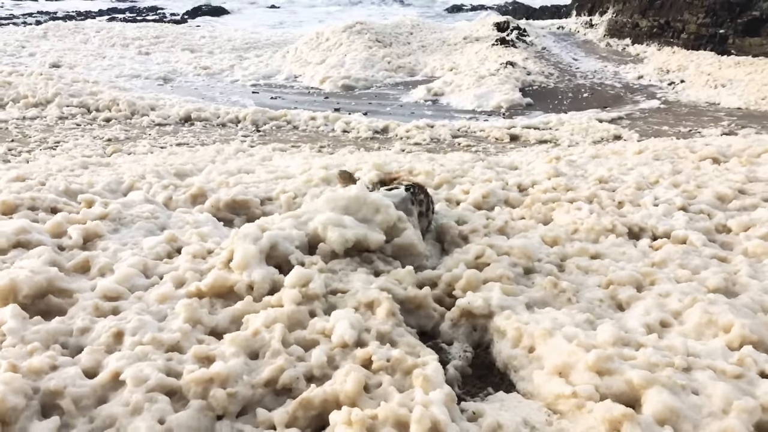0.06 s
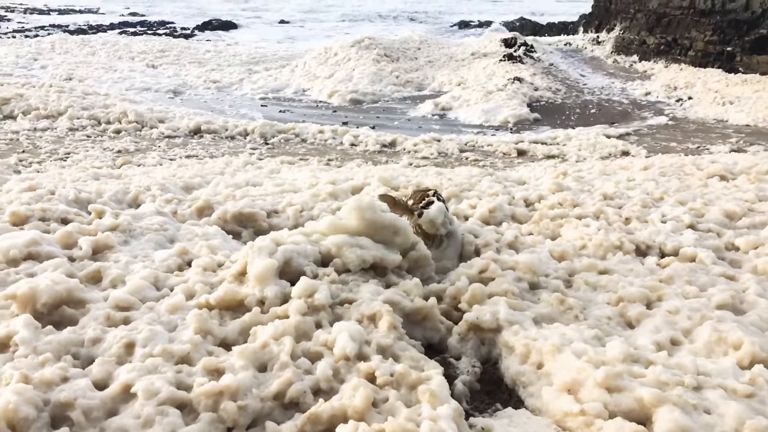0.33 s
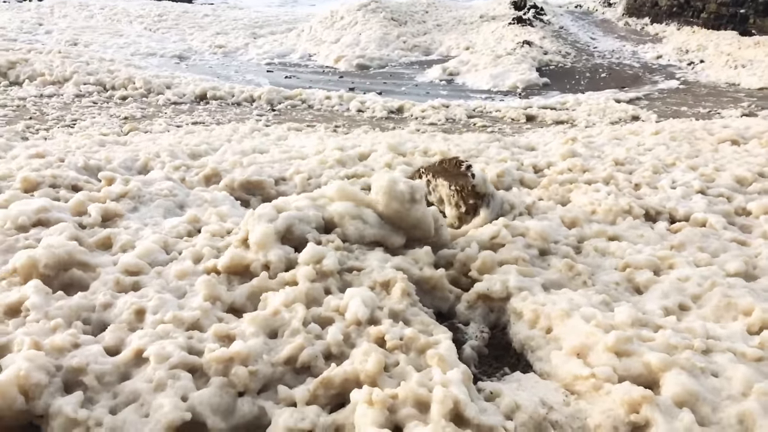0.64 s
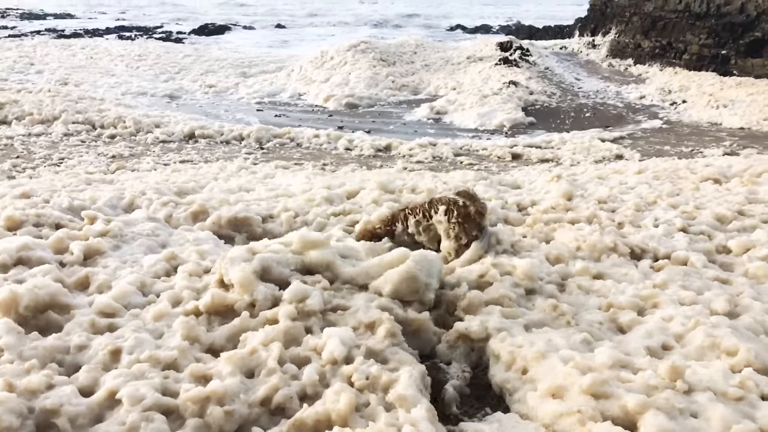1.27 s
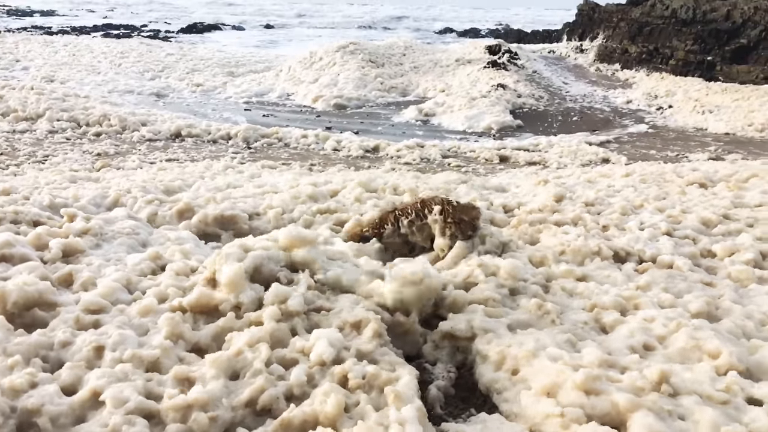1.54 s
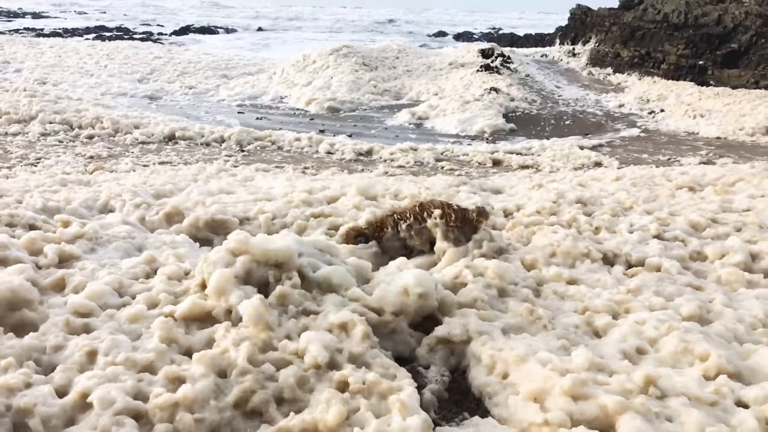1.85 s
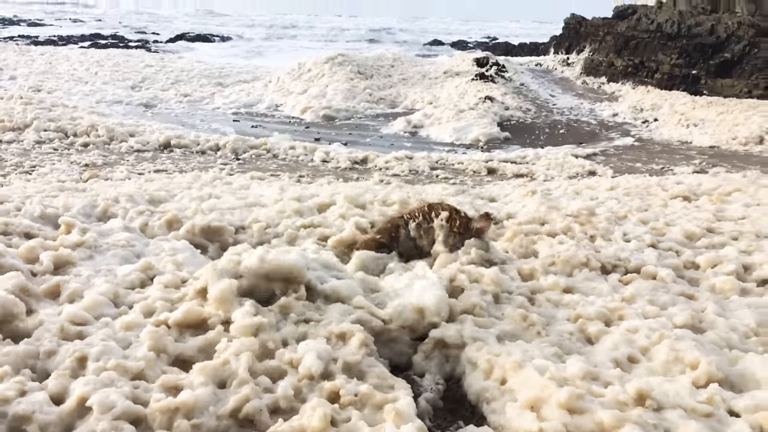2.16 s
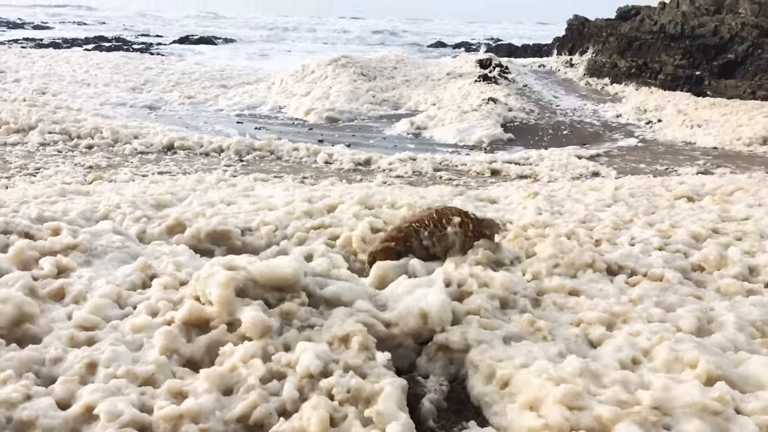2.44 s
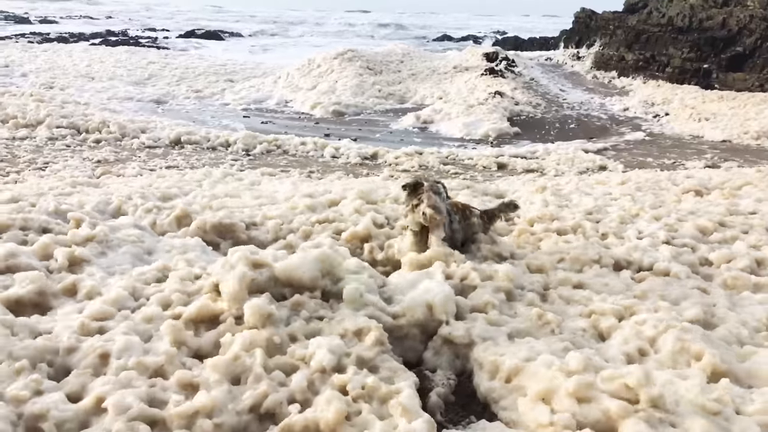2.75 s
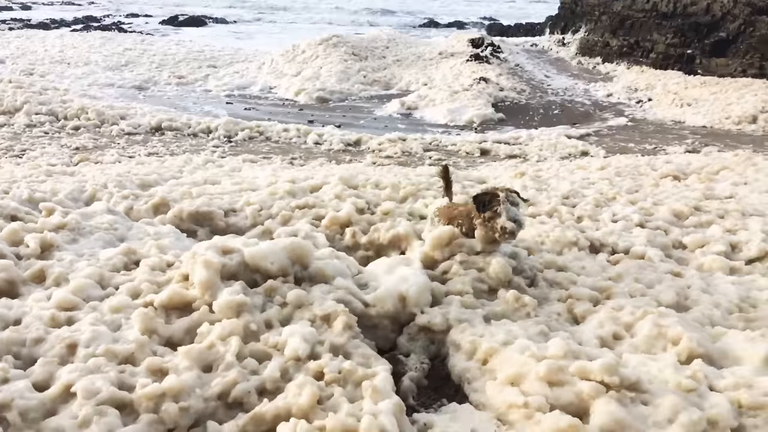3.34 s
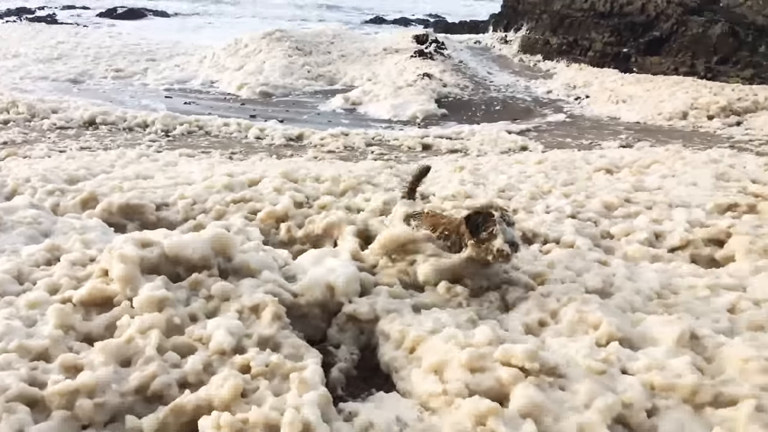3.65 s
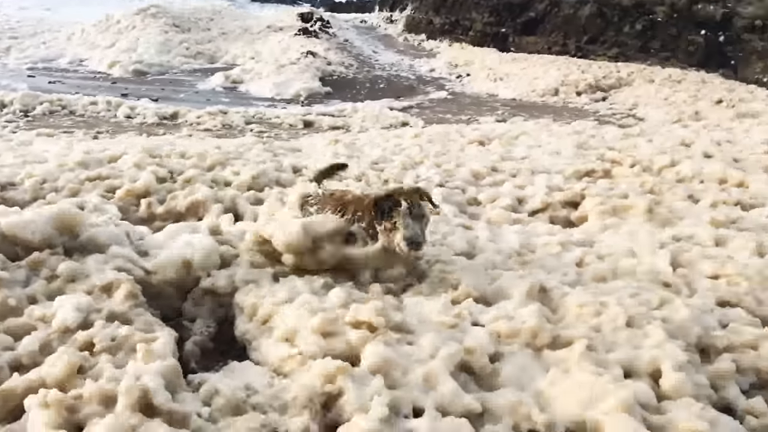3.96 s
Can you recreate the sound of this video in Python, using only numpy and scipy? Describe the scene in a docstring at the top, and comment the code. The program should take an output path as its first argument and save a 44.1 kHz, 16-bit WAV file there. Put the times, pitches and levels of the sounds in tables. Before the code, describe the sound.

Strong wind buffets the microphone on a beach, a low, fluttering rumble broken by irregular thumps and sharp pops. Surf washes faintly and steadily in the background throughout.

```python
"""Strong wind rumbles and flutters on a bare microphone, with surf washing steadily behind it on a beach.
Gusts buffet the microphone port; large eddies land as low thumps, small ones as sharp snaps that
leave the port ringing, and the sharpest break with a dry crack. Three faint ticks sound like foam
bubbles bursting, and near the end comes one short, bright hiss.
A limiter ducks everything after the hardest snaps."""
import sys
import numpy as np
from scipy import signal
from scipy.fft import rfft, irfft
from scipy.io import wavfile
from scipy.ndimage import uniform_filter1d, minimum_filter1d

SR = 44100
rng = np.random.default_rng(int(sys.argv[2]) if len(sys.argv) > 2 else 0)


def file_out(sig):
    """Save sig as 16-bit WAV at sys.argv[1]."""
    # one column per channel
    cols = np.atleast_2d(sig).T
    # limit, then scale
    lim = np.clip(cols, -1, 1)
    pcm = np.round(lim * 32767).astype(np.int16)
    wavfile.write(sys.argv[1], SR, pcm)


N = 176400

# Small, fast eddies hitting the port: centre_s, level_db, pitch_hz, length_cycles
SNAPS = [(0.147, -11, 473, 1.28), (0.186, -13, 504, 1.35), (0.227, -12, 446, 1.4), (0.253, -7.5, 460, 1.25),
         (0.323, -11, 485, 1.8), (0.3775, 4, 603, 2.06), (0.559, -5, 487, 1.3), (0.587, -7.5, 425, 1.06),
         (0.618, 0.5, 800, 0.97), (0.672, -8.5, 425, 2), (0.722, -8.5, 580, 1), (0.757, -12, 494, 1.6),
         (0.978, -1.5, 680, 0.42), (0.996, -7, 674, 0.6), (1.015, -15, 464, 2), (1.032, -12, 577, 4.3),
         (1.108, -18, 570, 1), (1.144, -2, 545, 3.4), (1.207, -14, 680, 1.2), (1.237, 2, 740, 1),
         (1.245, -8.5, 650, 2.1), (1.264, -3, 590, 2.3), (1.381, -2.5, 436, 1.94), (1.449, -12, 430, 0.83),
         (1.475, -7.5, 414, 1.5), (1.627, -10, 535, 3.1), (1.638, -6, 480, 1.1), (1.688, -17, 557, 1.8),
         (1.714, -10.5, 520, 1.15), (1.84, -3, 500, 1.45), (1.973, -2.5, 470, 0.84),
         (1.988, -0.5, 590, 0.87), (2.011, -2, 493, 0.79), (2.082, -6.5, 615, 1.2), (2.099, -9, 710, 1.2),
         (2.124, -13.5, 565, 1.2), (2.156, -11, 500, 1.8), (2.172, -8, 484, 1.1), (2.737, -11, 570, 0.48),
         (2.754, -9.5, 457, 3), (2.923, 2.5, 687, 1.27), (2.946, -5.5, 570, 0.79), (2.976, -4, 554, 1.43),
         (3.112, -10, 380, 1.04), (3.234, -10, 440, 1.34), (3.321, -16, 420, 1.45), (3.54, -5.5, 472, 3.1),
         (3.916, -6, 444, 2.3)]
SNAP_STEEPNESS = 2.85  # higher = narrower spectrum for the same length


def amp(db):
    """Decibels to gain."""
    return 10 ** (np.asarray(db) / 20)


def unit(x):
    """Scales to rms 1."""
    return x / np.sqrt(np.mean(x ** 2) + 1e-20)


def colour(x, spectrum):
    """EQ through (freq_hz, level_db) points on a log-frequency axis; white noise keeps its level."""
    size = 2 * len(x)
    hz = np.fft.rfftfreq(size, 1 / SR)
    freq_hz, level_db = np.transpose(spectrum)
    curve_db = np.interp(np.log(hz + 1), np.log(freq_hz + 1), level_db)
    return irfft(rfft(x, size) * unit(amp(curve_db)))[:len(x)]


def turbulence(spectrum, lump_hz, lump_db):
    """Coloured noise with random lumps in level, evened out over the length of a gust."""
    hz = np.fft.rfftfreq(N, 1 / SR)
    wander = unit(irfft(rfft(rng.standard_normal(N)) * np.exp(-(hz / lump_hz) ** 2), N))
    lumps = unit(amp(lump_db * 2 * np.tanh(wander / 2)))
    noise = colour(lumps * rng.standard_normal(N), spectrum)
    window = np.hanning(int(0.073 * SR))
    local_power = signal.fftconvolve(noise ** 2, window / window.sum(), "same")
    return noise / np.sqrt(local_power + 1e-9)


def pulse(centre_s, db, hz, cycles, steepness, lean_rad):
    """One smooth swing of pressure: with no lean a plain push, with more it pulls before it pushes."""
    t = np.arange(N) / SR - centre_s
    order = 1 + max(steepness * cycles ** 2, 1)
    near = abs(t) < 6 / hz
    swing = np.exp(-1j * lean_rad) / (1 - 2j * np.pi * hz * t[near] / order) ** order
    out = np.zeros(N)
    out[near] = swing.real * np.hanning(near.sum())
    return amp(db) * out


def surf():
    """Distant breakers: a patchy wash that brightens as it swells."""
    # Colour of the wash: freq_hz, level_db
    spectrum = [(100, 2), (400, -0.5), (800, -3), (1400, -7.5), (2200, -13), (3600, -19.5), (5500, -28.5),
                (8000, -35.5), (11000, -42), (15000, -46.5)]
    # Rise and fall of the breakers: time_s, level_db
    swell = [(0, -37), (.15, -38.5), (.26, -38.5), (.38, -39.5), (.63, -41.5), (.72, -38.5), (.86, -39),
             (1.03, -40), (1.5, -41.5), (2.15, -41.5), (2.45, -39), (2.7, -37), (2.87, -38.5), (3.3, -40),
             (3.6, -37.5), (4, -38.5)]
    hz, t, wash = signal.stft(colour(rng.standard_normal(N), spectrum), SR, nperseg=512, noverlap=384)
    swell_db = np.interp(t, *np.transpose(swell))
    treble_db = 0.23 * np.log2(1 + hz / 4000)[:, None] * (swell_db - swell_db.mean())
    patches = uniform_filter1d(rng.standard_normal(wash.shape), size=8, axis=0)  # smeared in frequency
    patch_db = 0.94 * unit(uniform_filter1d(patches, size=24, axis=1))  # and in time
    wash = wash * amp(swell_db + treble_db + patch_db)
    return signal.istft(wash, SR, nperseg=512, noverlap=384)[1][:N]


def ticks():
    """Faint, very high clicks, like foam bubbles bursting nearby."""
    # Moments of the clicks: centre_s
    times = [1.096, 1.243, 1.353]
    return sum(pulse(s, db=-44.5, hz=11000, cycles=1.2, steepness=SNAP_STEEPNESS, lean_rad=0)
               for s in times)


def hiss():
    """A brief bright hiss close to the microphone."""
    # Colour of the hiss: freq_hz, level_db
    spectrum = [(1000, -7), (3000, -4), (5000, -4.5), (8000, -6), (12000, -8.5), (15000, -13)]
    hold_start_s, hold_end_s, rise_s, fall_s = 3.586, 3.608, 0.024, 0.019
    t = np.arange(N) / SR
    fade = np.maximum(hold_start_s - t, 0) / rise_s + np.maximum(t - hold_end_s, 0) / fall_s
    return amp(-42.5) * np.exp(-fade ** 1.8) * colour(rng.standard_normal(N), spectrum)


def gusts():
    """Lumpy turbulence: each gust swells a low rumble and a flutter around the port's resonance."""
    # Gusts at the microphone: centre_s, length_s, rumble_db, flutter_db
    buffets = [(0, 0.14, -22, -35.5), (0.147, 0.071, -20, -34), (0.258, 0.091, -22, -36.5),
               (0.33, 0.048, -17, -25.5), (0.399, 0.014, -24, -24), (0.476, 0.019, -19.5, -31),
               (0.523, 0.043, -23, -33.5), (0.614, 0.07, -22, -25), (0.67, 0.028, -17.5, -46.5),
               (0.713, 0.027, -19, -28), (0.771, 0.022, -29, -25), (0.92, 0.065, -20, -33.5),
               (1.002, 0.081, -17.5, -20.5), (1.132, 0.085, -23.5, -25), (1.28, 0.087, -20.5, -22.5),
               (1.373, 0.054, -18, -21), (1.475, 0.051, -14.5, -24.5), (1.558, 0.027, -24, -52),
               (1.632, 0.046, -19.5, -26.5), (1.718, 0.064, -19, -26.5), (1.829, 0.064, -16.5, -27),
               (1.991, 0.069, -16.5, -18.5), (2.101, 0.066, -34, -27.5), (2.173, 0.035, -21, -35),
               (2.22, 0.039, -21.5, -27), (2.282, 0.044, -28.5, -39.5), (2.354, 0.078, -22, -32.5),
               (2.438, 0.013, -19, -27), (2.54, 0.08, -30.5, -38), (2.619, 0.033, -26, -30),
               (2.741, 0.069, -19, -28.5), (2.797, 0.066, -21.5, -34.5), (2.951, 0.074, -22.5, -27),
               (3.113, 0.058, -17, -25), (3.203, 0.061, -20.5, -31), (3.296, 0.038, -21.5, -33.5),
               (3.36, 0.029, -31.5, -47), (3.545, 0.054, -19, -22.5), (3.642, 0.042, -24.5, -41),
               (3.721, 0.075, -22.5, -28), (3.812, 0.017, -29, -29.5), (3.863, 0.027, -24, -27.5),
               (3.929, 0.043, -24, -22), (3.976, 0.027, -19.5, -28.5)]
    # Colour of the low buffeting: freq_hz, level_db
    rumble_spectrum = [(15, -38), (28, -20.5), (45, -6), (70, 3), (110, 0), (190, -5.5), (300, -17),
                       (500, -34.5), (1000, -52), (3000, -90)]
    # Colour of the air fluttering in the port: freq_hz, level_db
    flutter_spectrum = [(60, -29), (200, 2), (320, -4.5), (460, 0.5), (650, -8), (900, -16), (1400, -27.5),
                        (2200, -39), (3500, -60.5), (7000, -74)]
    t = np.arange(N) / SR
    rumble_power, flutter_power = np.full(N, amp(-30) ** 2), np.full(N, amp(-44.5) ** 2)  # steady breeze
    for centre_s, length_s, rumble_db, flutter_db in buffets:
        swell = np.exp(-abs(2 * (t - centre_s) / length_s) ** 3)
        rumble_power += swell * amp(rumble_db) ** 2
        flutter_power += swell * amp(flutter_db) ** 2
    wake_db, wake_s = -17.5, 0.014  # each snap trails a little flutter
    for s, db, _, _ in SNAPS:
        flutter_power += (t > s) * (amp(db + wake_db) * np.exp(-abs(t - s) / wake_s)) ** 2
    rumble_gain = np.sqrt(rumble_power)
    rumble = rumble_gain * turbulence(rumble_spectrum, lump_hz=38.2, lump_db=4)
    top = signal.sosfiltfilt(signal.butter(2, 176, "high", fs=SR, output="sos"), rumble)
    top_gain = (rumble_gain / amp(-20)) ** 0.4  # strong gusts are brighter, weak ones duller
    flutter_gain = np.sqrt(uniform_filter1d(flutter_power, size=88))
    flutter = flutter_gain * turbulence(flutter_spectrum, lump_hz=120.4, lump_db=6)
    return rumble + top * (top_gain - 1) + flutter


def thumps():
    """Large eddies pull and push the diaphragm once."""
    # Large, slow eddies: centre_s, level_db, pitch_hz
    eddies = [(0.052, -9, 117), (0.323, -5, 151), (0.773, -8.5, 150), (0.937, -3.5, 139), (0.967, -3, 165),
              (1.03, -6.5, 128), (1.262, -4, 150), (1.315, -4.5, 135), (1.385, -3.5, 123),
              (1.416, -9.5, 93), (1.47, -3.5, 108), (1.654, -9.5, 170), (1.771, -9.5, 119),
              (1.818, -4.5, 141), (1.979, -3, 148), (2.073, -4, 164), (2.125, -4.5, 138), (2.748, -7, 114),
              (3.123, -5, 176), (3.544, -6, 165), (3.727, -8.5, 158), (3.756, -11, 202), (3.923, -5.5, 179)]
    return sum(pulse(s, db, hz, cycles=0.98, steepness=3.5, lean_rad=0.53) for s, db, hz in eddies)


def snaps():
    """Small eddies slap the port and leave it ringing for a few milliseconds."""
    slaps = sum(pulse(s, db, hz, cycles, SNAP_STEEPNESS, lean_rad=0.89) for s, db, hz, cycles in SNAPS)
    ring_hz, decay_s, ring_db = 485, 0.0046, -15.5
    t = np.arange(SR // 20) / SR
    ring = 2 / (decay_s * SR) * np.exp(-t / decay_s) * np.sin(2 * np.pi * ring_hz * t)
    return slaps + amp(ring_db) * signal.fftconvolve(slaps, ring)[:N]


def cracks():
    """A bright click and a short spray of noise as an eddy breaks on the edge of the port."""
    # The sharpest eddies breaking: start_s, gain_db, pitch_hz
    breaks = [(.186, -33, 1290), (.323, -19.5, 1100), (.378, -9, 1160), (.619, -19.5, 1080),
              (.671, -24, 1370), (.722, -30, 950), (.978, -28.5, 1150), (.996, -23, 1200),
              (1.032, -29, 1350), (1.108, -26.5, 1680), (1.144, -15, 990), (1.206, -27.5, 1280),
              (1.237, -15.5, 1590), (1.263, -12.5, 1270), (1.309, -22, 1150), (1.449, -29, 1400),
              (1.714, -28, 1360), (1.84, -24.5, 970), (1.99, -28.5, 1100), (2.082, -29, 1300),
              (2.923, -28, 950)]
    # Colour of a crack around its pitch: pitch_ratio, level_db
    spectrum = [(.3, -22), (.65, 1), (1, 8.5), (1.65, -1), (2.3, -19.5), (3.1, -27.5), (5, -50), (9, -72.5)]
    spray_decay_s = 0.0015
    out, size = np.zeros(N), SR // 20
    for start_s, gain_db, pitch_hz in breaks:
        span = round(start_s * SR) - size // 2 + np.arange(size)
        t = span / SR - start_s
        click = amp(15) * np.sinc(t * SR)
        spray = amp(-5) * (t >= 0) * np.exp(-abs(t) / spray_decay_s) * rng.standard_normal(size)
        tuned = [(ratio * pitch_hz, db) for ratio, db in spectrum]
        out[span] += amp(gain_db) * colour(click + spray, tuned)
    return out


def scene():
    """Wind on the microphone over the surf, in mono."""
    wind = gusts() + thumps() + snaps() + cracks()
    return (wind + ticks() + surf() + hiss())[None]


def record(dry):
    """A look-ahead limiter ducks peaks above full scale and recovers slowly; a low-pass trims the top."""
    recovery_db_per_s, cutoff_hz = 9, 15400
    over_db = np.maximum(20 * np.log10(abs(dry[0]) + 1e-9), 0)
    recovery_db = np.arange(N) / SR * recovery_db_per_s
    duck_db = np.maximum.accumulate(over_db + recovery_db) - recovery_db
    held_gain = minimum_filter1d(amp(-duck_db), size=441)  # ducks just ahead of the peak
    smooth_gain = uniform_filter1d(uniform_filter1d(held_gain, size=221), size=221)
    lowpass = signal.firwin(511, cutoff_hz, window=("kaiser", 9), fs=SR)
    return signal.oaconvolve(dry * smooth_gain, lowpass[None], "same")


dry = scene()
out = record(dry)
file_out(out)
```